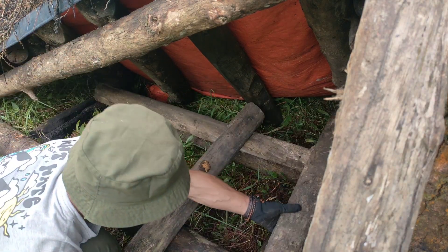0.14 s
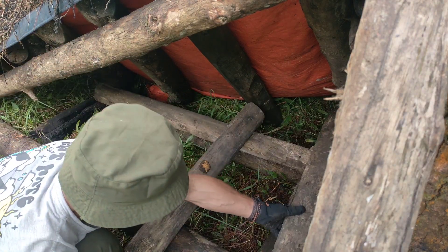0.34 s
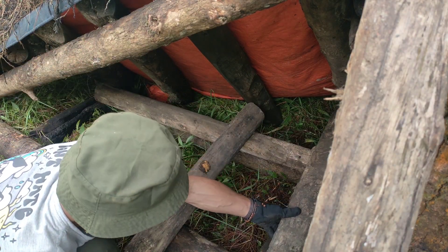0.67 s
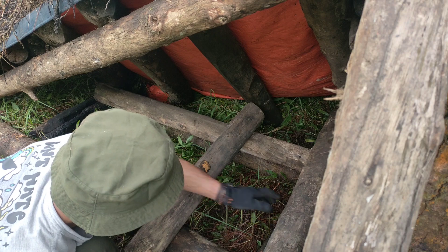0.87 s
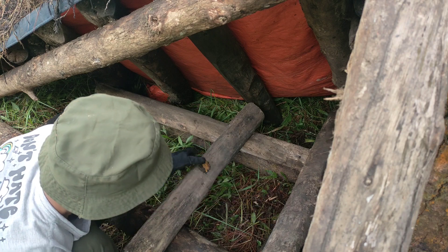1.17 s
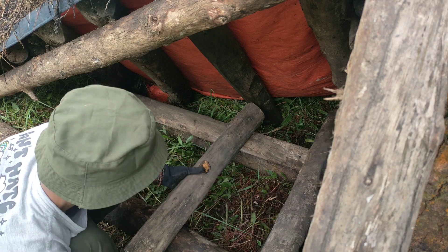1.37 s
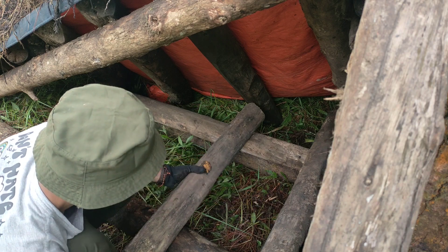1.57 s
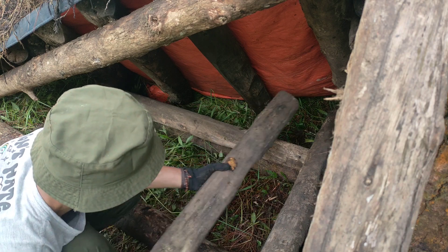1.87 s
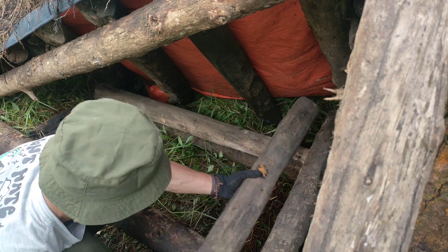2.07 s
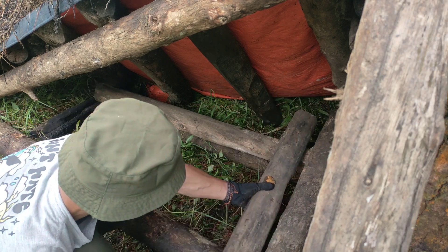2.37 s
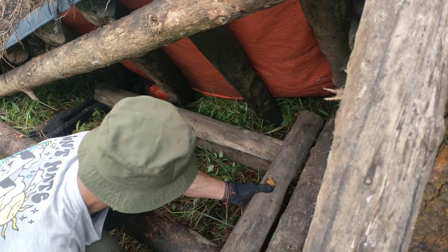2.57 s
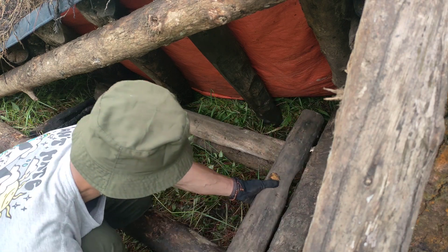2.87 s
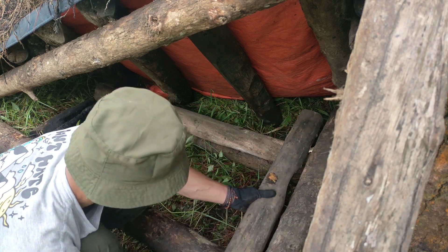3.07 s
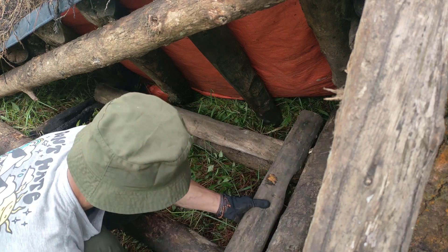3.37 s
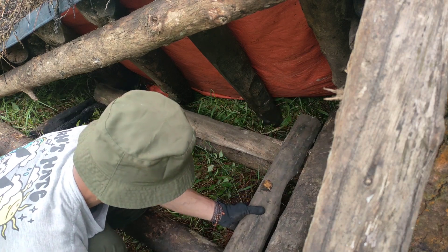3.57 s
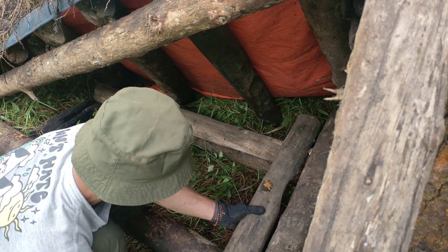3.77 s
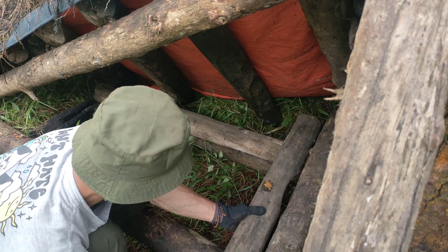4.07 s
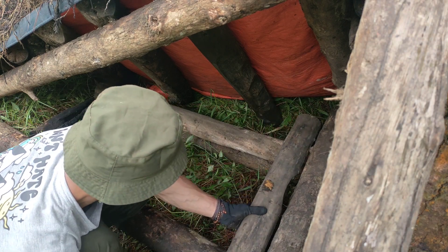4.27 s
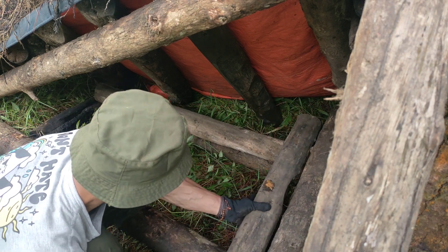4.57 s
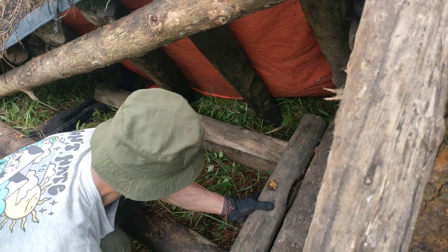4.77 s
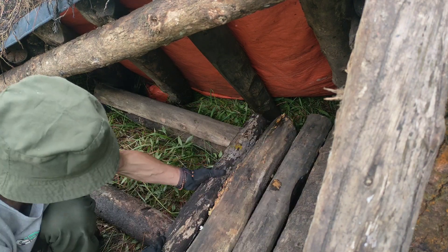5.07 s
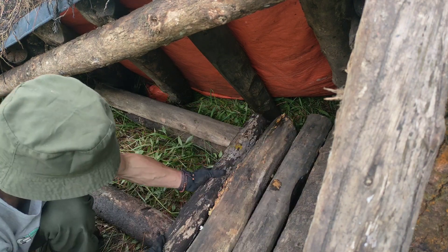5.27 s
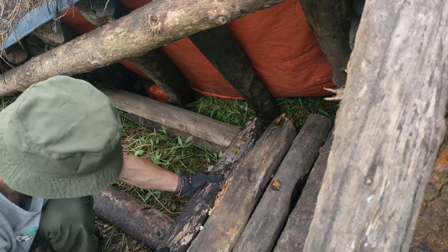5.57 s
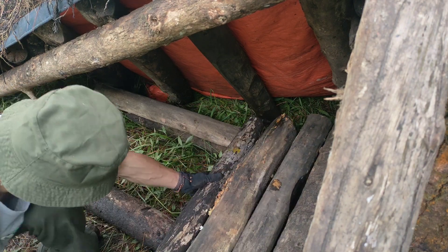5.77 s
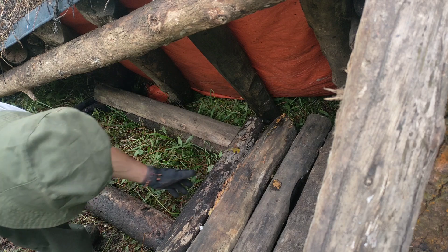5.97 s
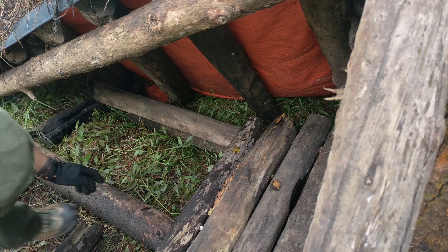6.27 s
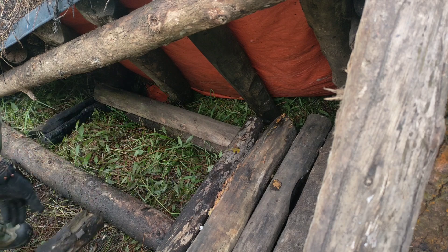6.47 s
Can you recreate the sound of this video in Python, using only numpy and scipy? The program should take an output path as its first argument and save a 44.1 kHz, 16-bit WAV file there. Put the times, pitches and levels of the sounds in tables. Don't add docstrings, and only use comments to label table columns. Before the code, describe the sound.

Someone handles short logs on grassy ground in a forest shelter, heard close in stereo. Damped woody thuds ring briefly, with tiny dry echoes: one quiet at the start, a strong pair in the middle, another firm pair later. Between them are brushing gloves, crackling bark, small bumps and shifting cloth. Behind lie soft hiss, sparse high bird chirps and a remote low motor that fades, then grows.

```python
import sys
import numpy as np
from scipy import signal
from scipy.fft import rfft, irfft
from scipy.io import wavfile
from scipy.ndimage import uniform_filter1d

SR = 44100
rng = np.random.default_rng(int(sys.argv[2]) if len(sys.argv) > 2 else 0)


def nominal_scale(level):
    x = np.asarray(level, float) / 20
    return 10 ** x


def log_audio(samples):
    frames = np.atleast_2d(samples).T
    limited = np.clip(frames, -1, 1)
    pcm = np.round(limited * 32767).astype(np.int16)
    wavfile.write(sys.argv[1], SR, pcm)


N = 292383

# frequency in Hz, density in dB per Hz.
HUM = [(25, -16), (53, -2), (103, -25), (135, -7.5), (165, 2), (195, -7.5), (237, -11.5), (400, -16.5)]
# frequency in Hz, density in dB per Hz.
HISS = [(769, -16), (1300, -17), (2100, -19), (3100, -25.5), (4500, -31.5), (7000, -46), (12300, -52.5),
        (13000, -76)]
# frequency in Hz, likeness from 0 to 1.
PORT_LIKENESS = [(60, 0.99), (290, 0.9), (630, 0.34), (1400, 0.7), (3000, 0.067), (7000, 0.042)]
# time in seconds, level in dB under its loudest.
NEARNESS = [(0, -14.5), (.5, -8.5), (1, -12), (1.6, -21), (2.2, -27), (2.8, -12), (3.3, -26), (3.8, -8),
            (4.3, -5.5), (4.8, -0.3), (5.3, 0), (5.8, -1.3), (6.2, 0.7), (6.63, 0)]
# centre in Hz, width in Hz, level in dB.
DRONE_MODES = [(45, 14, -17), (82.4, 32, -3.5), (162.9, 10, 3.5), (206, 15, 3), (351, 22, -2.5),
               (517, 95, -14.5)]
# start in seconds, peak in dB.
CHIPS = [
    (1.31, -62.5),
    (2.917, -62),
    (4.573, -58.5),
    (6.307, -57),
]
# peak time, rise and fall in seconds, level in dB,
# fine top in dB relative to the level.
BRUSHES = [(0.138, 0.0039, 0.011, -44, -16), (.531, 0.013, 0.078, -54, -12.5),
           (0.564, 0.061, 0.08, -54.5, -11), (2.393, 0.015, 0.099, -54, -14),
           (2.503, 0.011, 0.023, -63, -25), (2.561, .025, 0.019, -63.5, -14),
           (2.731, 0.003, 0.0089, -53.5, -8), (3.482, 0.015, 0.033, -56, -15.5),
           (3.808, 0.029, 0.031, -54, -18), (3.87, 0.23, 0.078, -59, -13.5),
           (4.025, 0.045, 0.081, -58, -19), (4.082, 0.018, 0.14, -55, -11.5),
           (4.159, 0.063, 0.2, -50, -18.5), (4.235, 0.055, 0.084, -52.5, -7), (4.43, 0.15, 0.07, -56, -8),
           (4.74, .09, 0.16, -62, -14), (5.205, 0.08, 0.064, -56, -13), (5.235, .05, 0.09, -56, -16),
           (5.275, .05, .13, -63, -11), (5.72, 0.076, 0.088, -59, -14)]
# peak time, rise and fall in seconds, level in dB,
# fine top in dB relative to the level.
SHIFTS = [(.06, 0.18, 0.36, -60, -12.5), (.4, 0.32, 0.7, -77, -11), (.69, 0.18, 0.19, -70.5, -18),
          (1.27, 0.046, 0.074, -90, -4), (1.65, 0.13, 0.083, -76, -12), (1.85, .08, 0.086, -73, -13),
          (2.89, 0.2, 0.14, -64.5, -15), (3.25, 0.18, 0.38, -60.5, -14), (3.66, 0.24, 0.63, -62.5, -12.5),
          (4.31, 0.31, 0.11, -59.5, -14), (4.53, 0.28, 0.11, -59, -9.5), (4.9, 0.31, 0.24, -60, -14),
          (5.02, .1, 0.18, -85, -24), (5.45, .6, .6, -84, -8), (5.92, 0.29, 0.5, -69, -15.5),
          (6.28, 0.27, 0.45, -61, -11), (6.55, 0.41, 0.27, -72.5, -22)]
# centre in Hz, width in Hz, level in dB.
CLOTH = [(2910, 560, -12), (3900, 2160, 5), (5370, 1100, -1)]
# start in seconds, length in seconds, level in dB,
# centre in Hz, width in Hz.
CHATTER = [(4.112, 0.034, -55, 3900, 400), (4.127, 0.039, -51, 3480, 300), (4.141, 0.057, -52.5, 2880, 200),
           (4.145, 0.024, -48.5, 4540, 300), (4.152, 0.045, -48, 3970, 350), (4.155, 0.035, -62, 5860, 300),
           (4.189, 0.014, -55, 3300, 600), (4.198, 0.075, -58, 4160, 400), (4.203, 0.037, -54, 5830, 400),
           (3.835, .025, -60, 2100, 700), (3.836, .018, -62, 3800, 300), (3.883, .01, -55, 6000, 400),
           (3.9, 0.023, -59, 5500, 350), (.53, 0.074, -58.5, 1900, 900), (2.855, 0.053, -64, 420, 200),
           (2.884, .07, -61, 600, 250), (2.901, 0.085, -64.5, 850, 250), (2.96, 0.11, -64, 398, 150),
           (4.208, 0.1, -62, 3300, 900), (4.24, .09, -67, 5200, 1200), (4.391, .04, -59, 1100, 500),
           (3.558, 0.096, -60.5, 330, 120), (3.782, 0.084, -64, 340, 120)]
# start in seconds, peak in dB, centre in Hz.
CRACKLES = [(.5492, -50, 3800), (0.561, -48, 4600), (.5705, -47, 2100), (3.7697, -49, 4470),
            (3.845, -43, 4240), (3.866, -44, 5000), (3.89, -43, 1500), (4.1377, -42, 3400),
            (4.1423, -42, 3830), (4.164, -43, 3900), (4.193, -48, 3200), (4.2819, -47, 3760),
            (3.126, -60, 3070), (3.4677, -53, 3260), (3.6139, -50, 3520), (3.6782, -51, 3210),
            (4.3904, -51, 4470), (4.4019, -49, 3050), (4.583, -51, 4440), (5.1661, -53, 3210),
            (5.209, -48, 4020), (5.228, -55, 4200), (6.2152, -55, 3780), (6.2541, -49, 3400),
            (6.524, -56, 3200), (.538, -51, 3000), (.582, -50, 5000), (.592, -53, 3500), (3.735, -54, 4500),
            (3.79, -51, 5500), (3.825, -50, 6200), (4.005, -49, 5200), (4.215, -52, 4700),
            (4.255, -52, 4200), (4.31, -54, 5200)]
# frequency in Hz, level in dB.
SNAP_COLOUR = [(300, -17), (1000, -9.5), (2000, 3), (4000, 1.5), (6500, -1), (8000, -21), (12000, -22),
               (15000, -29)]
# start in seconds, peak in dB, centre in Hz, dull wood in dB.
TICKS = [(0.2305, -58, 3690, -3), (0.5243, -53, 3550, 5), (0.6047, -48.5, 4570, 6), (0.81, -50, 2610, -10),
         (0.8946, -55, 3330, 3), (1.256, -62, 2610, 13), (2.3498, -44, 2770, -10), (2.4434, -45, 2850, 5),
         (2.5024, -48, 2950, -16), (2.558, -52, 2800, -19), (2.73, -36.5, 4480, -27),
         (2.843, -50.5, 2870, 4), (2.863, -53, 3020, 7.5), (3.197, -53, 3150, -12),
         (3.2414, -52, 5140, -11), (3.3103, -44.5, 3380, -10), (3.481, -40, 3480, 0.5),
         (3.649, -51, 3040, -12), (3.804, -48, 4180, -22), (3.894, -38, 5640, -15), (4.0142, -46, 2720, -9),
         (4.08, -43, 3200, 5), (4.4402, -44, 6300, -10), (4.534, -53, 3340, 2), (4.707, -49, 4470, -11),
         (4.728, -46, 2810, 8.5), (4.834, -48.5, 2370, 13.5), (4.997, -49, 2700, -9),
         (6.105, -48.5, 2960, -7), (6.166, -44, 2870, 5)]
# start in seconds, peak in dB.
FLICKS = [(0.2315, -65.5), (.6054, -63.5), (1.2535, -77), (3.243, -62), (3.807, -54.5), (4.08, -76),
          (4.31, -69), (4.4422, -62), (4.534, -58), (4.998, -69), (5.208, -67), (4.593, -67), (6.17, -79),
          (6.258, -63), (2.7288, -60), (3.48, -75), (3.8942, -69), (4.016, -71), (0.138, -68), (5.72, -72)]
# start in seconds, peak in dB, first pitch in Hz, last pitch in Hz,
# length in seconds.
KNEE = [
    (3.4795, -32.5, 97, 37, .046),
]
# start in seconds, peak in dB, pitch in Hz,
# 60 dB decay in seconds.
TAPS = [(0.532, -52, 1020, 0.06), (2.731, -53, 1043, 0.056), (3.888, -44.5, 885, 0.011),
        (4.478, -49, 1230, 0.015), (4.726, -47, 1260, 0.022), (4.834, -46.5, 1710, 0.036),
        (4.834, -46, 2320, 0.0205), (4.817, -50, 1100, .04), (2.3872, -45.5, 2830, 0.012),
        (2.391, -33.5, 560, 0.022), (4.999, -45.5, 480, 0.042), (0.15, -53, 496, 0.054),
        (2.4425, -33, 660, 0.016), (4.076, -46, 352, 0.071), (4.832, -35.5, 660, 0.034),
        (4.832, -37.5, 980, 0.025), (3.886, -54, 620, .015), (3.887, -51, 1100, 0.01),
        (4.078, -50, 880, 0.013), (2.844, -54, 420, 0.028), (2.6, -55, 800, 0.05), (3.4, -57, 2000, .03),
        (5.0, -48.5, 810, .08), (4.998, -53.5, 1100, 0.045), (2.393, -45.5, 1100, 0.037),
        (2.45, -50, 950, 0.088), (2.3917, -23, 330, .009), (.1402, -30, 300, .01)]
# start in seconds, peak in dB, pitch in Hz,
# 60 dB decay in seconds, overtone in dB.
BUMPS = [(0.604, -43, 275, 0.089, -21), (2.844, -40.5, 156, 0.032, -3), (3.475, -42, 180, 0.033, -22),
         (3.683, -41, 220, 0.026, -28), (4.076, -34.5, 223, 0.033, -13), (4.406, -42, 153, 0.036, -7),
         (4.703, -35.5, 203, 0.065, -9), (4.726, -36, 303, 0.03, -7.5), (4.821, -32.5, 231, 0.045, -24),
         (4.893, -29.5, 179, 0.03, -27), (5.818, -39, 76.6, 0.07, -19), (5.902, -39.5, 183, 0.097, -35),
         (.645, -45, 164, .15, -20), (.76, -46.5, 160, 0.088, -24), (3.849, -51.5, 69.6, .1, -20),
         (2.865, -46.5, 220, .04, -8), (2.9, -50, 188, 0.12, -11)]
# start in seconds, level in dB.
CRACKS = [
    (0.137, -37),
    (2.3882, -42),
    (4.835, -60),
    (4.996, -46.5),
]
# start in seconds, blow peak in dB, blow pitch in Hz, blow 60 dB decay in seconds,
# ring in dB.
KNOCKS = [
    (0.136, -34, 227, 0.018, -31.5),
    (.164, -35, 295, 0.042, -41),
    (2.3887, -11.5, 289, 0.023, -16.5),
    (2.4414, -16.5, 234, 0.03, -23.5),
    (4.8374, -22, 275, 0.042, -29),
    (4.996, -17.5, 280, 0.063, -34.5),
]
# pitch in Hz, level in dB, 60 dB decay in seconds.
LOG_MODES = [
    [(156, 4, 0.14), (239.6, 3.5, 0.42), (460, 3, 0.18), (760, -11, 0.085), (1050, -11.5, 0.08),
     (1255, -17, 0.082), (57.6, -7, 0.15), (380, -21, 0.063), (542, -4, 0.074), (625, -11, 0.081),
     (950, -19, 0.11), (1854, -8.5, 0.05)],
    [(340, 2, 0.071), (986, -1, 0.04), (1190, -8, 0.054), (490, 6.5, 0.089), (720, -5, 0.049)],
    [(214, -22, 0.22), (371.2, -3, 0.29), (468, -18, 0.41), (792, -9, 0.13), (989, -15, 0.13),
     (1224, -29, 0.1), (2830, -16, 0.011), (275, -26, .08), (600, -19, 0.047), (676, -12, 0.046),
     (900, -15, 0.056), (1642, -26.5, 0.084), (1886, -29, 0.036), (2280, -30, 0.08)],
    [(180, -15, 0.12), (280, -5.5, 0.23), (372.4, 3.5, 0.13), (705, 5, 0.016), (780, -20, 0.11),
     (1140, -30, 0.11), (550, -11, 0.037), (460, -17, 0.13), (1000, -25, 0.11), (1670, -24, 0.066),
     (2870, -6, 0.02)],
    [(271.7, 7, 0.14), (387, -4, 0.15), (461, -8.5, 0.14), (670, -1, 0.019), (970, -10, 0.086),
     (1083, -9.5, 0.058), (187, -9, 0.083), (337, -16, .1), (560, -11, 0.055)],
    [(162.7, 9, 0.13), (255.3, 6, 0.28), (361, -2.5, 0.18), (477.4, -1, 0.15), (810, -13, 0.16),
     (1060, -21, 0.078), (98, -5, 0.21), (206, -13, 0.18), (301, 2, .1), (600, -18, .06)],
]
# frequency in Hz, share from 0 to 1.
HOLES = [(2800, 0), (4000, .05), (5000, .15), (7000, .33), (8000, .52), (9500, .36), (12500, .37),
         (15000, .45)]
# frequency in Hz, threshold in spreads.
SLABS = [(5000, -3.5), (7000, -1.8), (8000, -.8), (9000, -1.6), (10000, -1), (12000, -1.1), (15000, -1.5)]

WOODS_DB, DRONE_DB = -55.5, -53
NEAR_HUM_DB, NEAR_HISS_DB = 4.5, 5.5
PORT_LAG_S = 0.00043
EDGE_DB, ROUND = -21, 1.38
FOLD_HZ, SCRAPE_DB, FOCUS_PER_DB, FOCUS_FROM_DB = 3800, -6, 0.26, 14
CRACKLE_T60_S, CRACKLE_WIDTH_HZ = 0.017, 1900
TICK_T60_S, TICK_PAN_DB, TICK_SCATTER_DB = 0.021, -3.5, 3.5
GRAIN_DB, GRAIN_LOW_HZ, GRAIN_HIGH_HZ, GRAIN_CYCLES = -29, 166.6, 2700, 125
OVERTONE = 2.32
SUDDEN_DB, BUSY_PER_DB, MAKE_UP = 5, .06, .4


def evened(x):
    return x / np.sqrt(np.mean(x ** 2) + 1e-20)


def read(points, hz):
    f, value = np.transpose(points)
    return np.interp(np.log(hz + 1), np.log(f + 1), value)


def add(mix, s, sound):
    part = mix[..., round(s * SR):][..., :sound.shape[-1]]
    part += sound[..., :part.shape[-1]]


def resonate(x, hz, width):
    r = np.exp(-np.pi * width / SR)
    return 2 * signal.lfilter([1 - r], [1, -r * np.exp(2j * np.pi * hz / SR)], x).real


def resonate_twice(x, hz, width):
    return resonate(resonate(x, hz, width), hz, 2 * width)


def coloured(x, points):
    gain = nominal_scale(read(points, np.fft.rfftfreq(x.shape[-1], 1 / SR)))
    return irfft(rfft(x) * gain, x.shape[-1])


def burst(t60, rise_s):
    t = np.arange(4096) / SR
    a, b, c = rng.standard_normal((3, len(t)))
    noise = evened(coloured(np.array([a + 3.0 * b, a + 1.6 * c]), SNAP_COLOUR))
    return 0.36 * noise * nominal_scale(-60 * t / t60) * (1 - np.exp(-t / rise_s))


def woods():
    frames, hz = N // 256 + 5, np.fft.rfftfreq(1024, 1 / SR)
    a, b, c, d, patches = rng.standard_normal((frames, 513, 5)).T
    patches = evened(uniform_filter1d(uniform_filter1d(patches, 6, 0), 10, 1))
    t = np.arange(frames) * 256 / SR
    low = 1 / (1 + (hz[:, None] / 450) ** 4)
    share_db = low * NEAR_HUM_DB + (1 - low) * NEAR_HISS_DB + np.interp(t, *np.transpose(NEARNESS))
    swell_db = 10 * np.log10(1 + nominal_scale(2 * share_db))
    same = np.clip(read(PORT_LIKENESS, hz), 0, 1)[:, None]
    left = a + 1j * b
    lag = np.exp(2j * np.pi * hz[:, None] * PORT_LAG_S)
    right = same * left * lag + np.sqrt(1 - same ** 2) * (c + 1j * d)
    colour = nominal_scale(read(HUM + HISS, hz))[:, None]
    z = np.array([left, right]) * colour * nominal_scale(1.5 * patches + swell_db) / np.linalg.norm(colour)
    return nominal_scale(WOODS_DB) * 1.205 * signal.istft(z, nperseg=1024, noverlap=768)[1][:, :N]


def drone():
    a, b, c = rng.standard_normal((3, N))
    noise = np.array([a + 0.5 * b, a + 0.27 * c])
    hum = sum(nominal_scale(db) * resonate_twice(noise, hz, w) for hz, w, db in DRONE_MODES)
    near_db = np.interp(np.arange(N) / SR, *np.transpose(NEARNESS))
    return nominal_scale(DRONE_DB + near_db) * evened(hum)


def bird():
    out, u = np.zeros((2, N)), np.linspace(0, 1, 1150)
    turns = np.cumsum(4620 - 520 * u ** 1.52) / SR
    chip = np.sin(np.pi * u) ** 0.33 * np.sin(2 * np.pi * turns)
    echoes = rng.standard_normal((2, 6000)) * nominal_scale(-30.5 - 30 * np.arange(6000) / 6000)
    echoes[:, 0] = 1
    for s, db in CHIPS:
        add(out, s, nominal_scale(db) * signal.fftconvolve(chip[None], echoes, axes=1))
    return out


def strokes():
    t = np.arange(0, N + 40, 40)[:, None] / SR
    s, rise, fall, level_db, top_db = np.transpose(BRUSHES + SHIFTS)
    away = np.where(t < s, (s - t) / rise, (t - s) / fall)
    power = nominal_scale(2 * np.maximum(level_db + EDGE_DB * away ** ROUND, -160))
    powers = (power, power * nominal_scale(2 * top_db))
    return [np.interp(np.arange(N) / SR, t[:, 0], np.sqrt(p.sum(1))) for p in powers]


def rustle():
    clumps = nominal_scale(1.13 * evened(uniform_filter1d(rng.standard_normal(N), 300)))
    sizes = nominal_scale(2.6 * np.minimum(rng.exponential(1, (3, N)), 3.5))
    slips = sizes * rng.standard_normal((3, N)) * (rng.random((3, N)) < 9000 / SR)
    shared = np.array([slips[2], np.roll(slips[2], 10)])
    slips = (slips[:2] + .5 * shared) * clumps
    body = evened(sum(nominal_scale(db) * resonate_twice(slips, hz, w) for hz, w, db in CLOTH))
    top = evened(coloured(slips, [(7000, -55.0), (8500, -2.0), (11000, -3.0), (14000, -6.0), (15100, -12.0)]))
    top *= nominal_scale([[.9], [-1.9]])
    scrape = evened(coloured(slips, [(200, -55.0), (500, -6), (1000, -6.0), (2200, -5.0),
                                     (3200, -13.5), (5000, -43)]))
    fold = evened(resonate(resonate(slips, FOLD_HZ, 1600), FOLD_HZ, 2400))
    rub, fine = strokes()
    focus = np.clip(FOCUS_PER_DB * (20 * np.log10(rub / fine) - FOCUS_FROM_DB), 0, 1)
    weave = np.sqrt(1 - focus) * (body + nominal_scale(SCRAPE_DB) * scrape) + np.sqrt(focus) * fold
    return rub * coloured(weave, [(4500, -0.5), (7200, 1.5), (8300, -5.5)]) + fine * top


def crackle():
    out = np.zeros((2, N))
    for s, length, db, hz, width in CHATTER:
        a, b, c = rng.standard_normal((3, 4096))
        u = np.minimum(np.arange(4096) / SR / length, 1)
        band = evened(resonate_twice(np.array([a + b, a + c]), hz, width))
        add(out, s, nominal_scale(db) * np.sin(np.pi * u ** 0.59) * band)
    for s, db, hz in CRACKLES:
        add(out, s, nominal_scale(db) * 3 * resonate(burst(CRACKLE_T60_S, .0002), hz, CRACKLE_WIDTH_HZ))
    return out


def ticks():
    out = np.zeros((2, N))
    for s, db, hz, wood_db in TICKS:
        snap = burst(TICK_T60_S, 0.0001)
        pan_db = TICK_PAN_DB + TICK_SCATTER_DB * rng.standard_normal()
        wood = nominal_scale(wood_db) * 3 * resonate(resonate(snap, 1400, 1100), 1200, 2200)
        body = 3.1 * resonate(snap, hz, 1100) + wood
        add(out, s, nominal_scale(db) * nominal_scale([[pan_db / 2], [-pan_db / 2]]) * (snap + body))
    for s, db in FLICKS:
        flick = resonate(resonate(burst(TICK_T60_S, 0.0001), 9900, 4500), 10800, 5500)
        add(out, s, nominal_scale(db) * flick * nominal_scale(31.0))
    return out


def blow(hz, t60):
    t = np.arange(6000) / SR
    shape = t ** 1.89 * nominal_scale(-130 * t / t60)
    return shape / shape.max() * np.sin(2 * np.pi * hz * t)


def grain(t):
    place, size = rng.random((2, 36, 1))
    hz = GRAIN_LOW_HZ * (GRAIN_HIGH_HZ / GRAIN_LOW_HZ) ** place
    level_db = GRAIN_DB - 11 * place - 8 * size - 60 * t * (hz + 350) / GRAIN_CYCLES
    return (nominal_scale(level_db) * np.sin(2 * np.pi * hz * t)).sum(0) * (1 - np.exp(-t / 0.0024))


def log_ring(modes, after):
    t = np.arange(SR // 2) / SR
    lag = t + np.array([[.0001], [0]])
    ring = np.zeros((2, len(t)))
    for f, mode_db, decay in modes:
        twin = 0.19 * nominal_scale(-90 * t / decay) * np.sin(2 * np.pi * f * 0.968 * lag)
        lean = nominal_scale(np.array([[-1], [1]]) * 0.69 * np.tanh((f - 480) / 200))
        touch = np.maximum(t - after - .006, 0) / 0.041
        held = np.exp(-touch * (f / 242) ** 1.7)
        ring += held * lean * nominal_scale(mode_db - 60 * t / decay) * (np.sin(2 * np.pi * f * lag) + twin)
    return ring * (1 - np.exp(-(t / .0035) ** 2))


def knee():
    out = np.zeros((2, N))
    for s, db, first_hz, last_hz, length in KNEE:
        u = np.linspace(0, 1, round(length * SR))
        turns = np.cumsum(first_hz + (last_hz - first_hz) * u) / SR
        swell = (4 * u * (1 - u)) ** 0.82 * (1.25 - 0.76 * u)
        add(out, s, nominal_scale(db) * swell * np.sin(2 * np.pi * turns))
    return out


def knocks():
    out, t = knee(), np.arange(6000) / SR
    gaps = np.diff([k[0] for k in KNOCKS] + [9])
    for (s, db, hz, t60, ring_db), modes, after in zip(KNOCKS, LOG_MODES, gaps):
        fibres = resonate(resonate(burst(0.025, 0.001), 1300, 1800), 1300, 2600)
        bark = resonate(resonate(burst(0.28, 0.0038), 1000, 1500), 1500, 2500)
        add(out, s, nominal_scale(ring_db) * log_ring(modes, after))
        add(out, s, nominal_scale(db) * (blow(hz, t60) + grain(t)))
        add(out, s, nominal_scale(db - 26.0) * fibres)
        add(out, s, nominal_scale(db - 26.5) * bark)
    for s, crack_db in CRACKS:
        add(out, s, nominal_scale(crack_db) * (burst(0.11, 0.0015) + nominal_scale(-13) * burst(0.089, 0.00082)))
    for s, db, hz, t60, over_db in BUMPS:
        add(out, s, nominal_scale(db) * (blow(hz, t60) + nominal_scale(over_db) * blow(OVERTONE * hz, t60)))
    for s, db, hz, t60 in TAPS:
        add(out, s, nominal_scale(db) * blow(hz, t60))
    return out * nominal_scale([[.3], [-.3]])


def shelter(x):
    taps = np.zeros((2, 8000))
    at = np.arange(100, 7980, 20) + rng.integers(0, 20, (2, 394))
    np.put_along_axis(taps, at, rng.choice([-1., 1.], at.shape), 1)
    taps *= nominal_scale(-60 * np.arange(8000) / SR / 0.054)
    return signal.fftconvolve(x, taps / np.linalg.norm(taps[0]), axes=1)[:, :N]


def scene():
    background = woods() + drone() + bird()
    cloth = rustle() + crackle()
    logs, snaps = knocks(), ticks()
    echoes = shelter(nominal_scale(-19.0) * logs + nominal_scale(-10.0) * snaps)
    return background + cloth + snaps + logs + echoes


def roll_off(x):
    return signal.sosfilt(signal.butter(12, 15230, fs=SR, output="sos"), x)


def record(dry):
    x = signal.sosfilt(signal.butter(1, 40, "high", fs=SR, output="sos"), dry)
    hz, t, z = signal.stft(x, SR, nperseg=1024, noverlap=768)
    quick_db = 10 * np.log10((abs(z[:, hz > 3000]) ** 2).mean((0, 1)) + 1e-20)
    treble_db = signal.medfilt(quick_db, kernel_size=21)
    busy = 1 + np.clip(BUSY_PER_DB * (treble_db - np.median(treble_db)), -.3, .7)
    busy *= quick_db < treble_db + SUDDEN_DB
    blocks = rng.standard_normal((len(t) // 4 + 1, len(hz) // 3 + 1)).T
    blocks = uniform_filter1d(blocks, size=3, axis=1)
    field = evened(np.kron(blocks, np.ones((3, 4)))[:len(hz), :len(t)])
    chance = 1 / (1 + np.exp(-1.7 * field))
    share = read(HOLES, hz)[:, None] * busy
    slabs = rng.standard_normal((len(t) // 4 + 1, len(hz) // 12 + 1)).T
    slabs = evened(uniform_filter1d(slabs, size=2, axis=1))
    slab = np.kron(slabs, np.ones((12, 4)))[:len(hz), :len(t)] < read(SLABS, hz)[:, None]
    z *= np.where(slab & (busy > 0), nominal_scale(-28.0), 1)
    z *= np.where(chance < share, nominal_scale(-28.0), 1) * (hz < 15220)[:, None]
    z /= np.sqrt(1 - MAKE_UP * np.minimum(share, .8))
    return roll_off(signal.istft(z, SR, nperseg=1024, noverlap=768)[1][:, :N])


dry = scene()
out = record(dry)
log_audio(out)
```